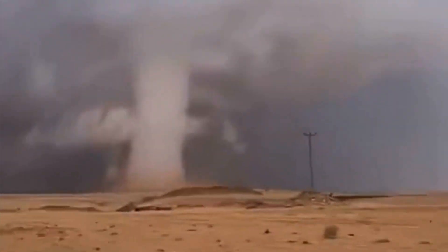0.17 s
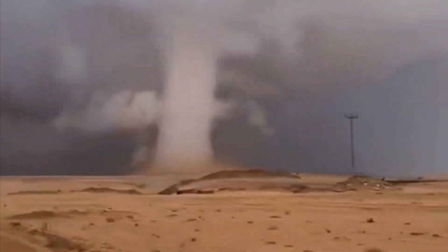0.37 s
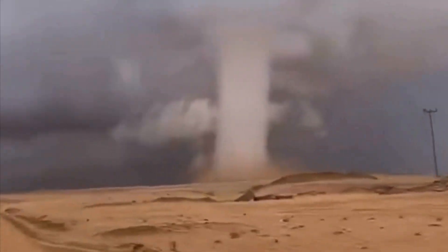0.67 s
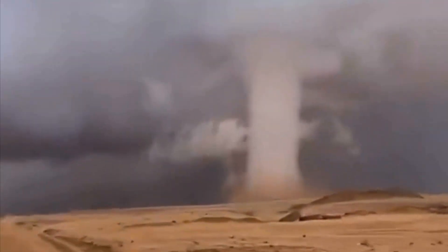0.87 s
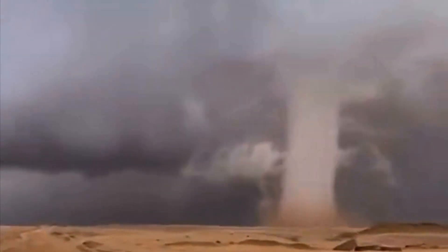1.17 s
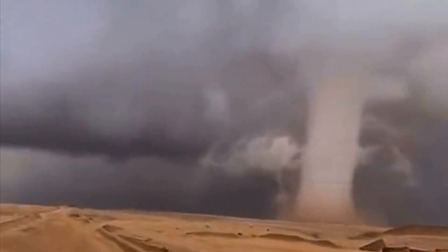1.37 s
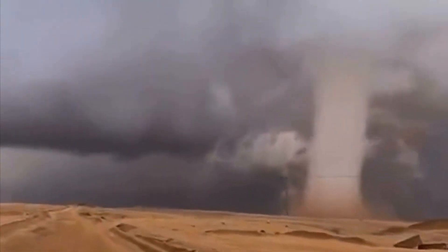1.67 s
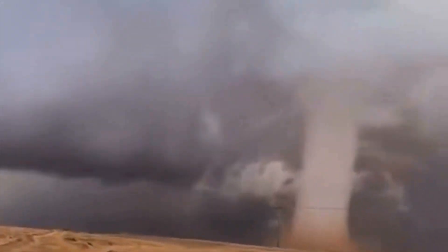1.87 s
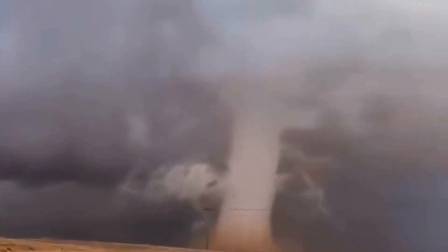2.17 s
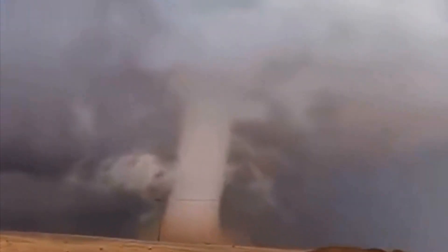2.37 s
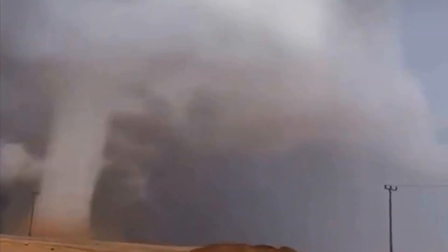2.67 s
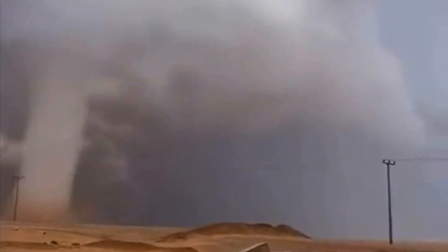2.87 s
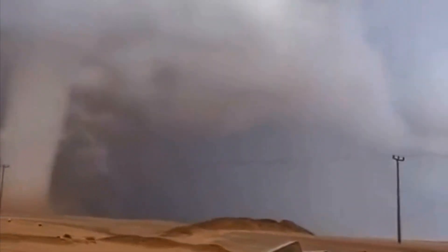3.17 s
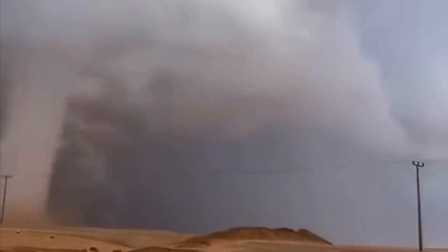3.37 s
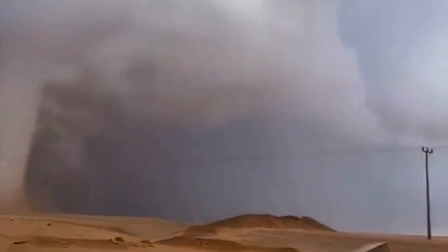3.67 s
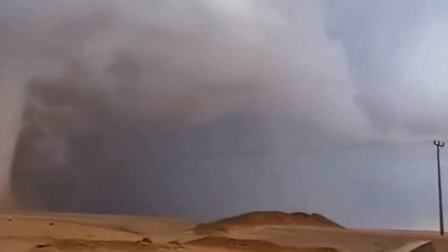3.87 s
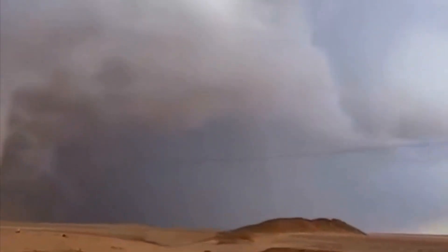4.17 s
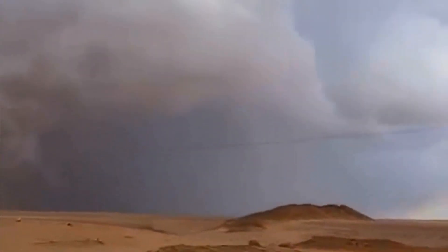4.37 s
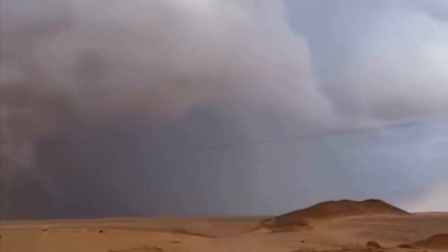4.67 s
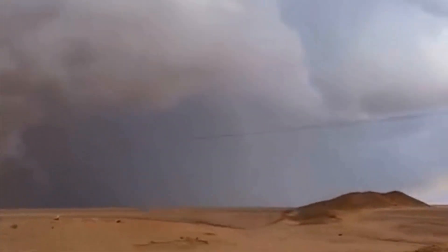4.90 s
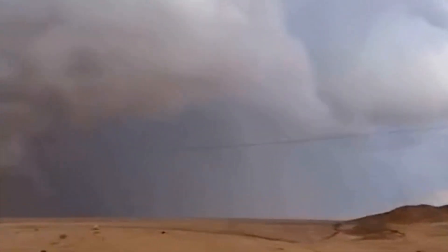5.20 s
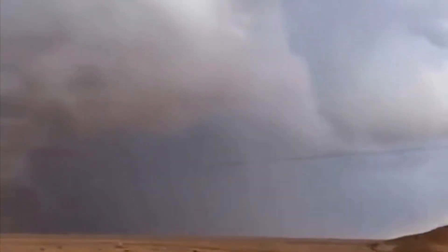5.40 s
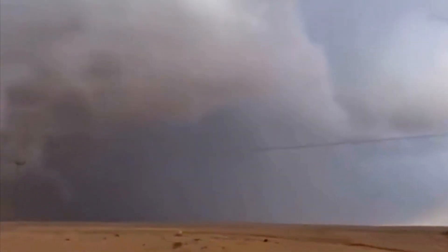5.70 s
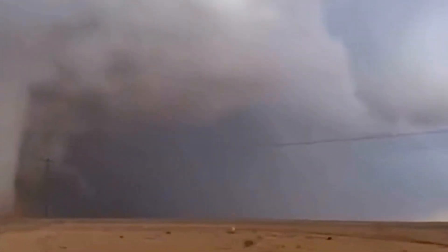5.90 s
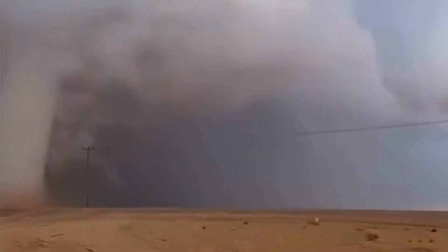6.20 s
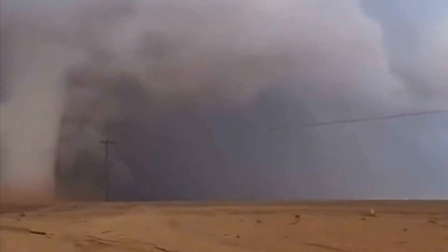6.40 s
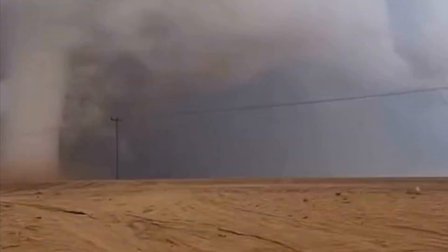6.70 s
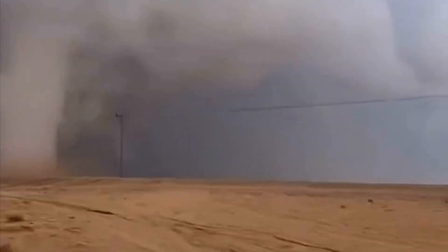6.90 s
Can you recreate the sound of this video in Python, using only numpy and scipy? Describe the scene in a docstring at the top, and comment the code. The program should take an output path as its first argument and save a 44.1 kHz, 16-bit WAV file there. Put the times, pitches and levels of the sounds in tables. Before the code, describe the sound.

Loud, unsteady wind roars and flaps across an exposed microphone, crackling with short bursts over faint sand hiss, with one abrupt late dropout.

```python
"""Desert storm at a microphone port

A desert storm blows across a phone microphone. Big eddies rumble, smaller ones flutter and rasp over the port:
noise bands shaped by one unsteady flow. Blown sand hisses behind, as treble noise that follows a level curve.
Sharp puffs of fast air spit into the port, as short bells of noise broken into snaps.
A limiter holds the peaks; the sound cuts out once."""
import sys
import numpy as np
from scipy import signal
from scipy.fft import rfft, irfft, next_fast_len
from scipy.io import wavfile
from scipy.ndimage import uniform_filter1d, minimum_filter1d, map_coordinates

SR = 44100
rng = np.random.default_rng(int(sys.argv[2]) if len(sys.argv) > 2 else 0)


def invert_db(level):
    """Linear amplitude ratio for a level in decibels (20 dB per decade), elementwise."""
    return 10 ** (np.asarray(level, dtype=float) / 20)


def bounce(signal):
    """Save signal as a 16-bit WAV file at the path given by the first command-line argument."""
    frames = np.transpose(np.atleast_2d(signal))
    limited = np.clip(frames, -1, 1)
    pcm = np.round(limited * 32767).astype(np.int16)
    wavfile.write(sys.argv[1], SR, pcm)


N = 310905  # samples

# air flow at the port: start_s, strength_db, speed_db (flutter over strength), raggedness_db
FLOW = [(0, -10, -3, 7), (.5, -16, -1, -2.5), (.66, -13.5, -2.5, 4.5), (1.0, -15, -14, -11.5),
        (1.45, -14.5, -1.5, 2.5), (1.9, -13, -9, -6), (2.1, -11.5, -5, 3.5), (2.36, -10.5, -5.5, 10.5),
        (2.62, -13, 3, 4.5), (2.9, -11, -6.5, 5), (3.2, -10, -0.5, 6.5), (3.67, -14, -0.5, 1),
        (3.97, -11, -9, 3.5), (4.18, -17, 4.5, -1.5), (4.36, -12.5, -1.5, 3.5), (4.6, -14.5, 0.5, -1.5),
        (5.25, -15, -0.5, 1.5), (5.98, -12.5, 4.5, 2), (6.5, -13, 2.5, 2.5), (6.73, -12.5, -2.5, 5.5),
        (7.05, -14, -10, -7)]
# brief lulls of the flow, and one slight swell (negative depth):
# centre_s, length_ms (between 1/e points of the depth), depth_db
LULLS = [(0.054, 38, 22), (0.179, 57, 17.5), (.31, 74, 21), (.43, 40, -1), (.58, 86, 18.5), (.8, 42, 10),
         (.89, 79, 8), (1.211, 70, 7), (1.421, 32, 15), (1.54, 42, 17), (2.72, 140, 5), (3.26, 13, 1.5),
         (3.37, 51, 10.5), (3.73, 32, 7), (4.44, 54, 6.5), (6.05, 87, 6), (6.21, 130, 3.5), (6.33, 116, 7),
         (6.965, 58, 1.5)]
# blown sand, thickest in the second second, thinning out after the third: start_s, hiss_db
SAND_HISS = [(0, -58), (.58, -62), (.95, -54), (1.2, -53.5), (1.49, -51.5), (1.88, -52.5), (2.15, -57),
             (3.26, -57.5), (3.36, -65.5), (4.0, -69.5), (4.97, -72.5), (5.2, -67), (5.78, -64.5),
             (6.23, -69.5), (6.5, -65)]
# brief swells and slight dips of the sand hiss: centre_s, change_db (added to the hiss)
SAND_SWELLS = [(.02, -2), (.57, -0.5), (.99, 6), (1.055, 6), (1.275, 2.5), (1.49, 3), (1.59, 3)]
# strong puffs of fast air: peak_s, length_ms (nominal), spit_db, tear_db (over the spit)
STRONG_PUFFS = [(.01, 6.3, -12, -18), (.11, 30, -20.5, -30), (.146, 11, -26, -23), (.219, 11, -27, -36),
                (.246, 12, -22.5, -28), (.26, 7.2, -16, -21), (.283, 7.6, -29, -20), (.344, 9.1, -26, -20),
                (.368, 26, -19.5, -27), (.418, 5.5, -28, -38), (.464, 17, -19, -28),
                (.516, 15.6, -14.5, -29), (.629, 8, -30, -22), (.672, 9.7, -25, -32), (.733, 30, -23, -41),
                (.835, 12, -30, -36), (.968, 8, -26.5, -25), (.992, 16, -30.5, -16), (1.365, 6.8, -25, -27),
                (1.381, 5.5, -24, -21), (1.446, 7.8, -23, -25), (1.461, 11, -28, -25),
                (1.554, 16, -29, -20), (1.637, 8, -23, -32), (1.804, 17, -24, -18), (2.096, 22, -14.5, -18),
                (2.13, 19.5, -12, -20), (2.169, 29, -23.5, -28), (2.251, 15, -20, -37.5),
                (2.308, 20, -21, -18), (2.339, 11, -7, -19), (2.377, 21, -20, -34), (2.422, 29, -20, -33),
                (2.584, 12, -12, -24), (2.628, 8.1, -19.5, -23), (2.77, 4, -10, -19),
                (2.81, 59, -18, -10.5), (2.856, 5.7, -18, -7), (2.914, 20, -14, -16),
                (2.945, 7.4, -16, -13), (2.989, 9.3, -7, -10), (3.133, 18, -10.5, -10),
                (3.187, 5.4, -10.5, -30), (3.225, 12, -24.5, -11), (3.294, 28, -16, -23),
                (3.332, 9.6, -11, -6), (3.394, 17.6, -8.5, -12), (3.433, 7.7, -17, -13),
                (3.492, 9, -19, -39), (3.539, 18, -11, -8.5), (3.561, 14, -19, -9.5), (3.644, 11, -17, -15),
                (3.662, 3.2, -14, -14), (3.71, 17.5, -15, -11), (3.748, 12, -7, -5),
                (3.795, 9.8, -21.5, -22), (3.848, 12, -20, -15.5), (3.875, 15, -17, -9.5),
                (3.901, 18, -30, -14), (3.978, 10, -15.5, -13), (4.025, 4.9, -15.5, -18),
                (4.071, 7.8, -19.5, -18), (4.109, 39, -24, -14), (4.157, 10.6, -10.5, -11),
                (4.202, 2, -10, -17.5), (4.315, 32, -27, -19), (4.362, 5, -20, -27.5),
                (4.4, 20, -26.5, -22), (4.458, 8.5, -20, -22), (4.584, 10.6, -28.5, -24),
                (4.654, 9.2, -15, -11), (4.763, 62, -26, -18.5), (4.829, 10, -23, -13),
                (4.901, 12, -18, -16), (4.957, 11.6, -9, -9.5), (5.047, 8.5, -29, -26),
                (5.098, 9.8, -19, -9), (5.146, 14, -17, -13), (5.179, 10, -13.5, -10.5),
                (5.231, 25, -18.5, -13), (5.28, 11, -29, -14), (5.327, 11, -26.5, -13.5),
                (5.421, 12, -29, -18.5), (5.451, 9.7, -25.5, -10.5), (5.539, 16, -27, -18),
                (5.63, 29, -27, -14.5), (5.816, 21, -13.5, -12), (5.851, 13, -28, -7),
                (5.941, 24, -21, -10.5), (6.073, 9.1, -27, -31), (6.138, 66, -33, -13),
                (6.362, 9.7, -25, -24), (6.399, 19, -13, -13.5), (6.463, 12, -7, -13),
                (6.486, 8.4, -19, -14), (6.572, 15, -11.5, -9.5), (6.637, 18.4, -16, -4),
                (6.675, 30, -30, -9), (6.943, 14, -19.5, -6.5)]

# spectral densities of the eddies, large to small: frequency_hz, density_db (relative, per Hz)
RUMBLE_TONE = [(15, -46.5), (30, -16.5), (55, 1), (100, -1), (160, -5), (300, -23.5), (800, -32),
               (16000, -120)]
FLUTTER_TONE = [(60, -38.5), (130, -16.5), (200, 4.5), (330, -0.5), (500, -8.5), (900, -22.5), (2000, -36),
                (16000, -120)]
RASP_TONE = [(200, -30), (550, 0), (1000, -9), (2000, -19), (3500, -28), (8000, -44), (10000, -60),
             (16000, -66)]
# spectral density of the sand hiss: frequency_hz, density_db (relative, per Hz)
SAND_TONE = [(300, -5), (1000, 8), (2500, 5.5), (3700, 0), (7000, -1), (9500, -9.5), (11500, -19),
             (14600, -10.5), (16000, -15)]
# spectral densities of a puff's low push, spit and torn core: frequency_hz, density_db (relative, per Hz)
THUD_TONE = [(100, -25), (300, 5), (500, 0.5), (900, -7.5), (1500, -22.5), (3000, -46), (16000, -120)]
SPIT_TONE = [(500, -18.5), (1000, 2.5), (1600, 1.5), (2500, -4), (3600, -19), (7000, -55.5), (16000, -120)]
TEAR_TONE = [(1500, -15), (3200, 1), (5000, -10.5), (7700, -18.5), (9700, -33.5), (14500, -36),
             (16000, -40)]
# the silence: start_s, end_s
DROPOUT = (6.7378, 6.935)

RUMBLE_FEELS, RASP_FEELS = 0.46, 0.44  # share of a lull's depth; the flutter feels all of it
RASP_DB = -33  # at raggedness 0
SWELL_S = 0.018  # half width of a swell or dip of the hiss, to 1/e of its change in dB
WEAK_COUNT = 120
WEAK_MS, WEAK_MS_SCATTER = 10.3, 0.65  # median nominal length; scatter of its natural logarithm
WEAK_DB, WEAK_SCATTER_DB = -31.5, 2  # mean spit at raggedness 0 outside lulls; scatter
WEAK_TEAR_DB, TEAR_SCATTER_DB = -28, 6  # mean tear over the spit; scatter
THUD_DB, THUD_GROWS, THUD_SCATTER_DB = -15, 0.73, 4  # push of a -19.5 dB spit; dB per dB of spit; scatter
SNAP_DB, TEAR_SNAP_DB = 5, 6  # dB per unit of the snap curve
CEILING = .9  # peak amplitude ahead of the low-pass
TOP_HZ = 15600  # low-pass corner


def unit(x):
    """Normalization by mean power: scaled to rms 1."""
    return x / np.sqrt(np.mean(x ** 2) + 1e-20)


def curves(rows):
    """Linear interpolation: one value per sample for each column after the time."""
    s, *columns = np.transpose(rows)
    return [np.interp(np.arange(N) / SR, s, column) for column in columns]


def wobble(rate):
    """Spline interpolation of random knots, rate knots a second, gives a smooth random curve."""
    return map_coordinates(rng.standard_normal(N // 20), [np.arange(N) * rate / SR])


def bells(rows, power):
    """Superposition of bell shapes, one per (centre s, half width s, height)."""
    t = np.arange(N) / SR
    return sum(height * np.exp(-np.abs((t - s) / half) ** power) for s, half, height in rows)


def noise(tone, lumps_db, lo_hz, hi_hz):
    """Spectral shaping of white noise to rms 1 between lo_hz and hi_hz, then modulation by lumps of rms 1."""
    size = next_fast_len(N + 8192)
    hz = np.fft.rfftfreq(size, 1 / SR)
    tone_hz, tone_db = np.transpose(tone)
    white = rfft(rng.standard_normal(size))
    spectrum = white * invert_db(np.interp(np.log(hz + 1), np.log(tone_hz), tone_db))
    lumps = unit(invert_db(lumps_db))
    band = irfft(spectrum * (hz > lo_hz) * (hz < hi_hz), size)
    return lumps * irfft(spectrum, size)[:N] / np.std(band)


def flow():
    """Unsteady flow: strength, speed and raggedness of the air, and the depth of its lulls, all in dB."""
    lull_db = bells([(s, ms / 2000, db) for s, ms, db in LULLS], power=2)
    return *curves(FLOW), lull_db


def stream(strength_db, speed_db, ragged_db, lull_db):
    """Turbulence: one flow shakes three sizes of eddy; the smaller they are, the more they follow its surges."""
    surge = unit(wobble(25) + 1.35 * wobble(70))
    rumble = noise(RUMBLE_TONE, 2.13 * surge + 0.52 * wobble(20), 30, 100)
    flutter = noise(FLUTTER_TONE, 3 * surge + 1.1 * wobble(40), 199, 450)
    rasp = noise(RASP_TONE, 4.5 * surge + 4.5 * wobble(250), 700, 3000)
    rumble_gain = invert_db(strength_db - RUMBLE_FEELS * lull_db)
    flutter_gain = invert_db(strength_db + speed_db - lull_db)
    rasp_gain = invert_db(RASP_DB + ragged_db - RASP_FEELS * lull_db)
    return rumble_gain * rumble + flutter_gain * flutter + rasp_gain * rasp


def sand():
    """Amplitude modulation of treble noise: a smooth far hiss that breathes a little."""
    swells_db = bells([(s, SWELL_S, db) for s, db in SAND_SWELLS], power=2.2)
    hiss_db = curves(SAND_HISS)[0] + swells_db
    breath_db = .8 * wobble(20) + 1.2 * wobble(60)
    return invert_db(hiss_db) * noise(SAND_TONE, breath_db, 11000, 15500)


def weak_puffs(ragged_db, lull_db):
    """Random arrivals, unevenly spaced: rows like the strong puffs, louder where the flow is ragged."""
    when = rng.random(WEAK_COUNT)
    long, loud, torn = rng.standard_normal((WEAK_COUNT, 3)).T
    at = ((np.arange(WEAK_COUNT) + when) / WEAK_COUNT * N).astype(int)
    length_ms = WEAK_MS * np.exp(WEAK_MS_SCATTER * long)
    spit_db = WEAK_DB + ragged_db[at] - lull_db[at] + WEAK_SCATTER_DB * loud
    tear_db = WEAK_TEAR_DB + TEAR_SCATTER_DB * torn
    return np.transpose([at / SR, length_ms, spit_db, tear_db])


def puffs(rows):
    """Intermittent turbulence: each puff is a short bell of torn air, broken into snaps a few ms apart."""
    thud, spit, tear = np.zeros((3, N))
    t = np.arange(N) / SR
    for (s, ms, spit_db, tear_db), chance in zip(rows, rng.standard_normal(len(rows))):
        near = slice(max(round((s - .05) * SR), 0), round((s + .05) * SR))
        u = (t[near] - s) * 2000 / ms  # time in half lengths
        u = np.where(u < 0, -1.6 * u, 0.74 * u)  # quicker to come than to go
        thud_db = THUD_DB + THUD_GROWS * (spit_db + 19.5) + THUD_SCATTER_DB * chance
        thud[near] += invert_db(thud_db - 7.9 * (u / 0.98) ** 2.75)  # the low push lasts longer
        spit[near] += invert_db(spit_db - 6 * (u / .7) ** 1.8)
        tear[near] += invert_db(spit_db + tear_db - 6 * (u / .6) ** 2)  # only the core tears
    snaps = wobble(450)
    low = thud * noise(THUD_TONE, 1.7 * snaps, 400, 1400)
    middle = spit * noise(SPIT_TONE, SNAP_DB * snaps, 810, 3500)
    high = tear * noise(TEAR_TONE, TEAR_SNAP_DB * snaps, 3430, 9000)
    return low + middle + high


def scene():
    """Superposition: everything arrives at one microphone port."""
    strength_db, speed_db, ragged_db, lull_db = flow()
    wind = stream(strength_db, speed_db, ragged_db, lull_db)
    rows = np.concatenate([STRONG_PUFFS, weak_puffs(ragged_db, lull_db)])
    return (wind + sand() + puffs(rows))[None]


def top_cut(x):
    """Nothing passes above the cut-off."""
    return signal.sosfilt(signal.butter(12, 16330, fs=SR, output="sos"), x)


def record(dry):
    """Gain control: a fast look-ahead limiter, a momentary dropout, then a steep low-pass."""
    x = dry * invert_db(1.0)
    hold = round(0.0022 * SR)
    need = np.minimum(1, CEILING / (np.abs(x) + 1e-9))
    gain = uniform_filter1d(minimum_filter1d(need, 2 * hold + 1), hold)
    t = np.arange(N) / SR
    live = np.clip(np.maximum(DROPOUT[0] - t, t - DROPOUT[1]) / .0002, 0, 1)  # 0.2 ms ramps
    low_pass = signal.ellip(10, .1, 70, TOP_HZ, fs=SR, output="sos")
    mix = signal.sosfilt(low_pass, x * gain * live)
    return top_cut(mix)


dry = scene()
out = record(dry)
bounce(out)
```